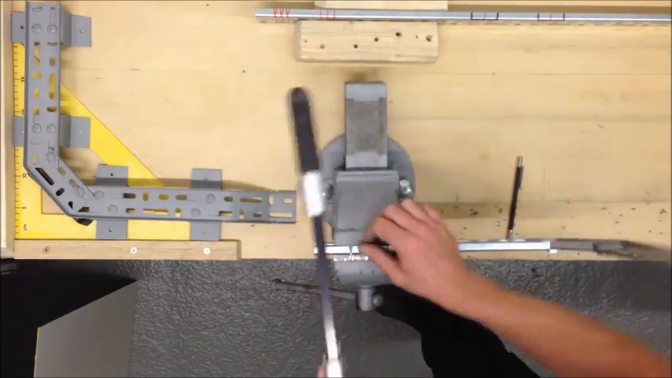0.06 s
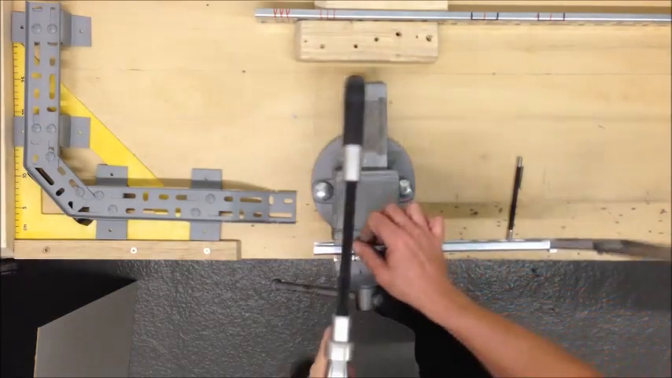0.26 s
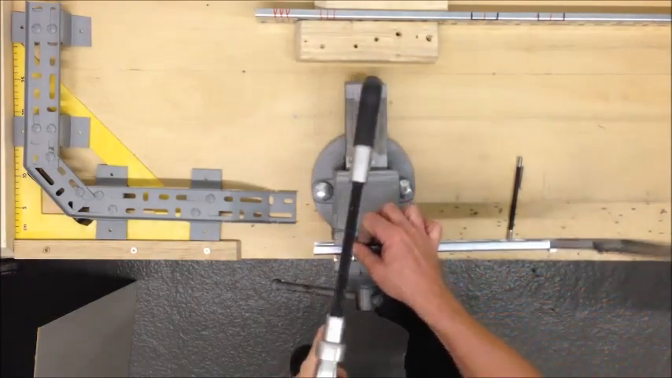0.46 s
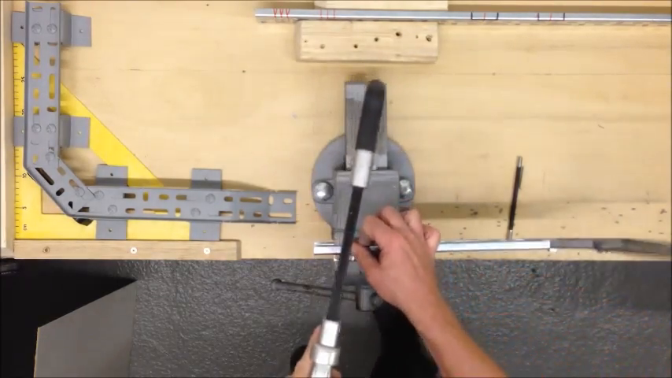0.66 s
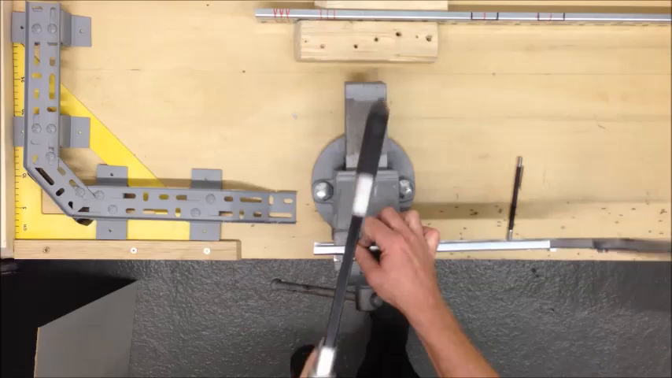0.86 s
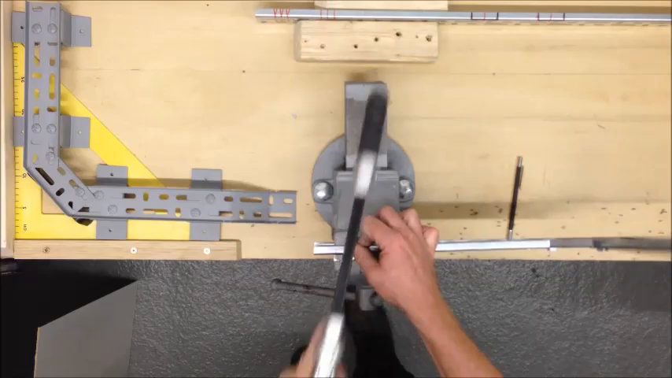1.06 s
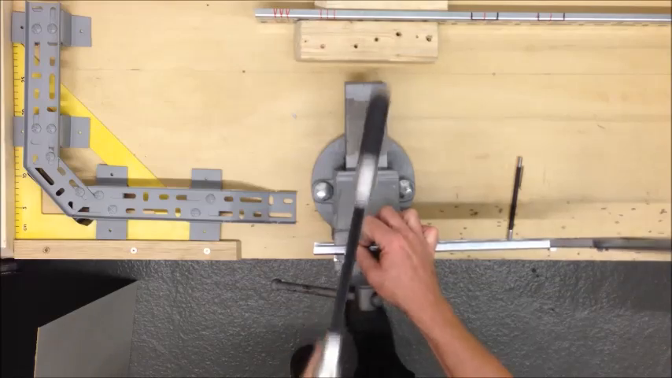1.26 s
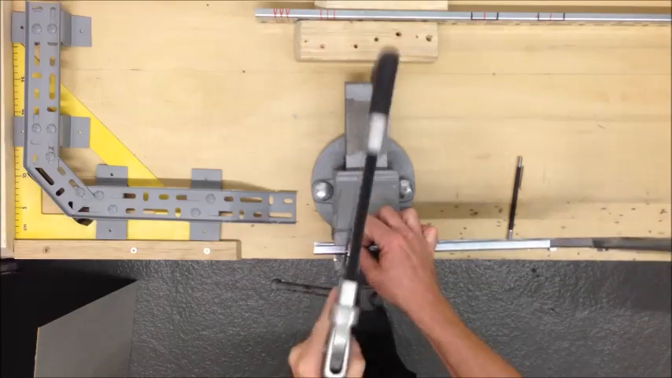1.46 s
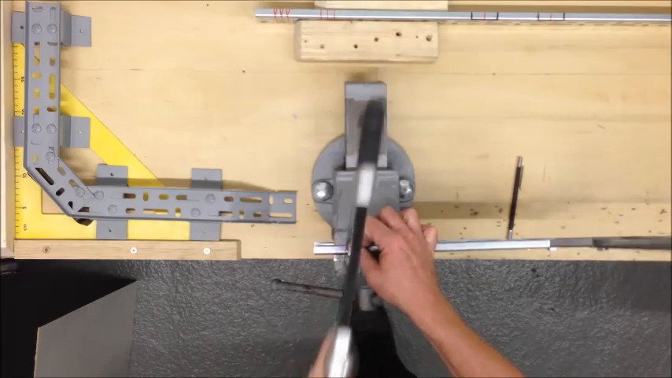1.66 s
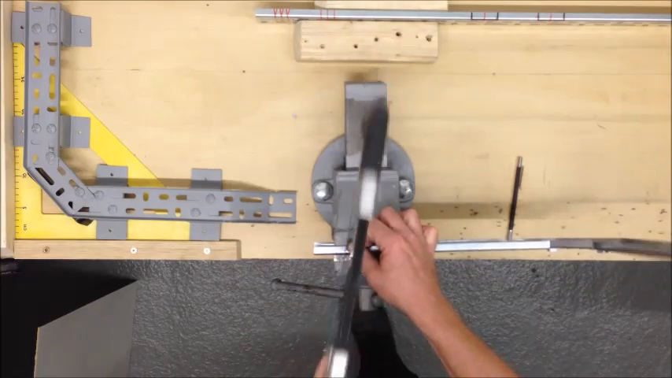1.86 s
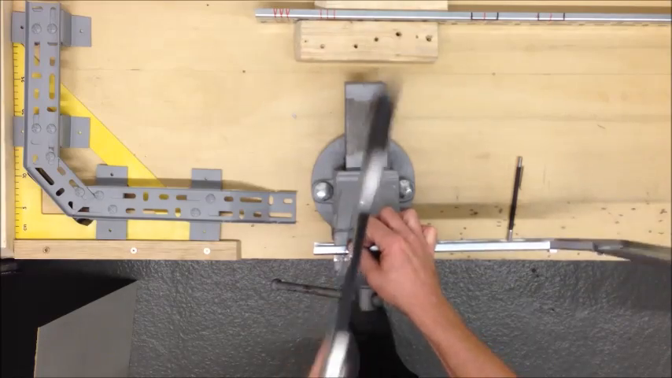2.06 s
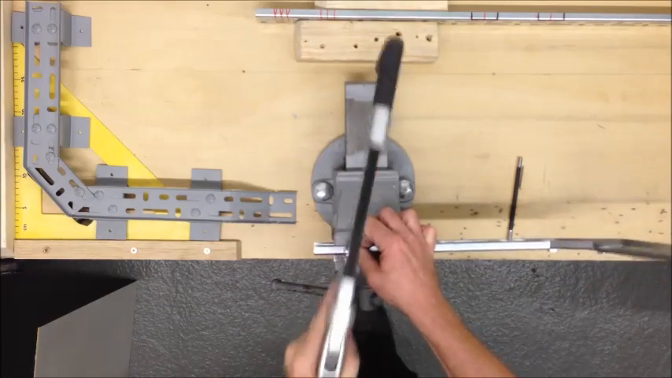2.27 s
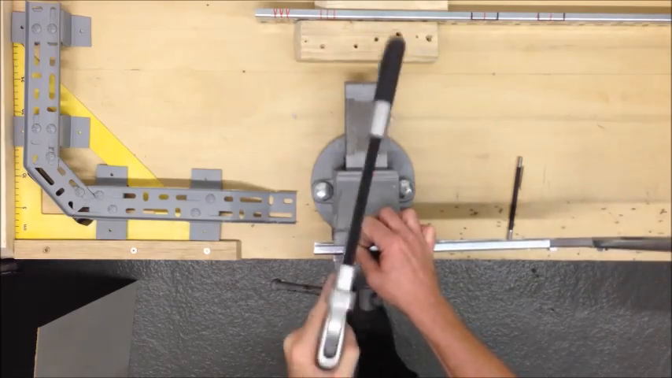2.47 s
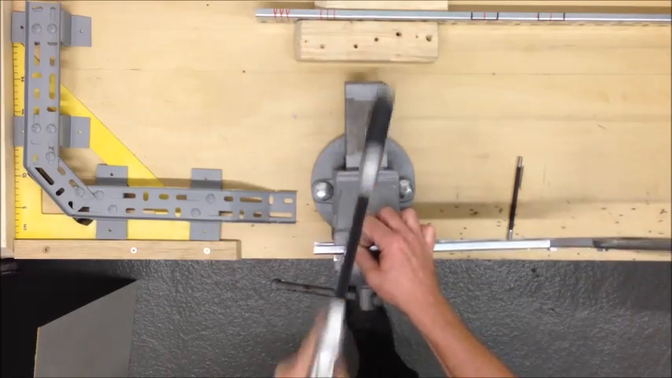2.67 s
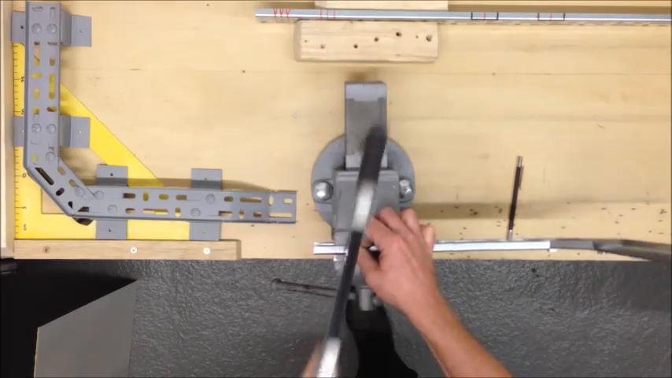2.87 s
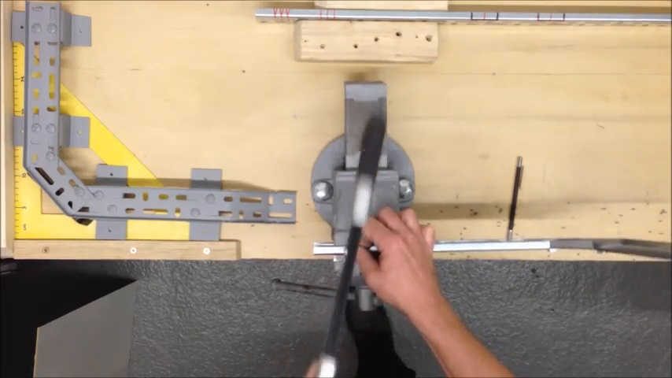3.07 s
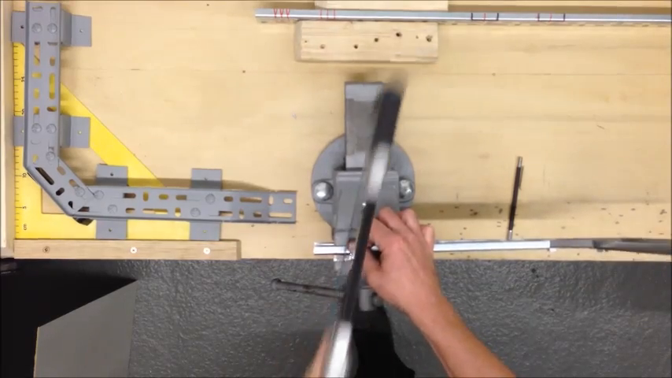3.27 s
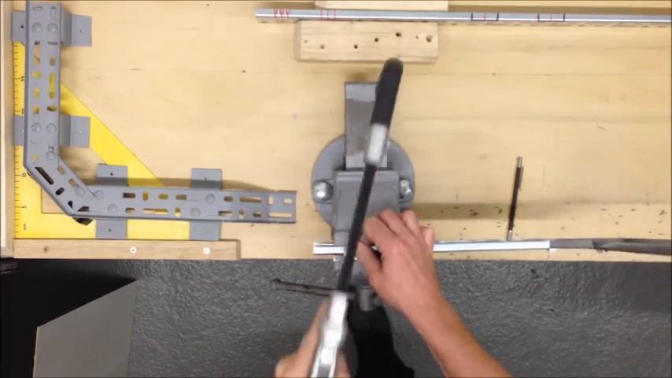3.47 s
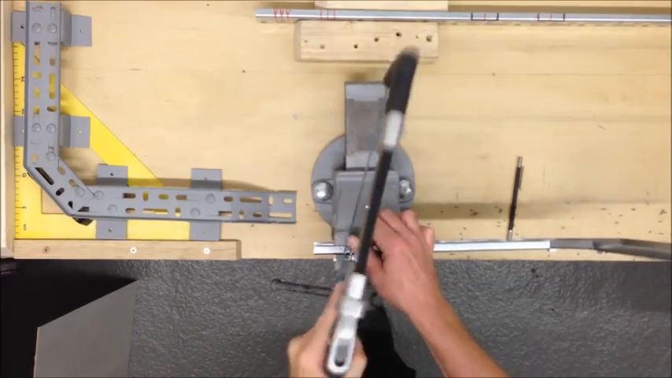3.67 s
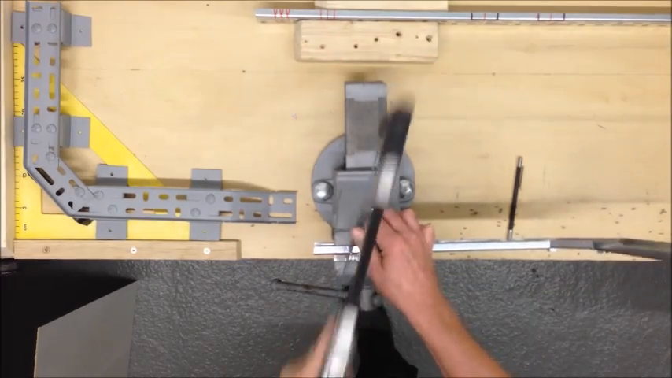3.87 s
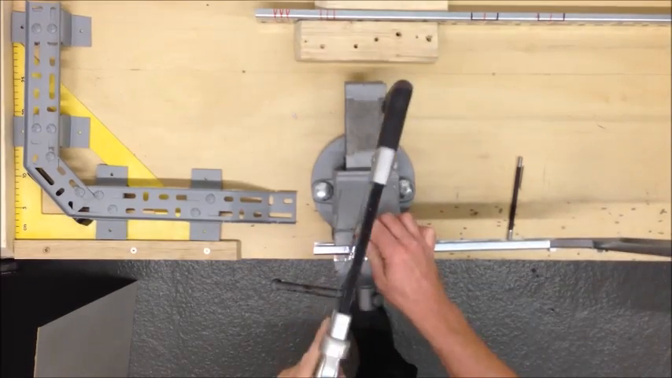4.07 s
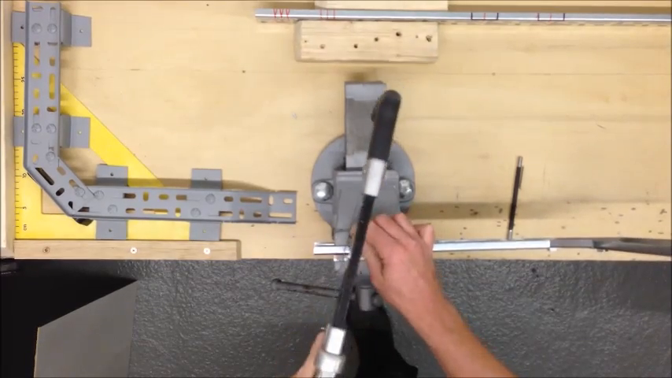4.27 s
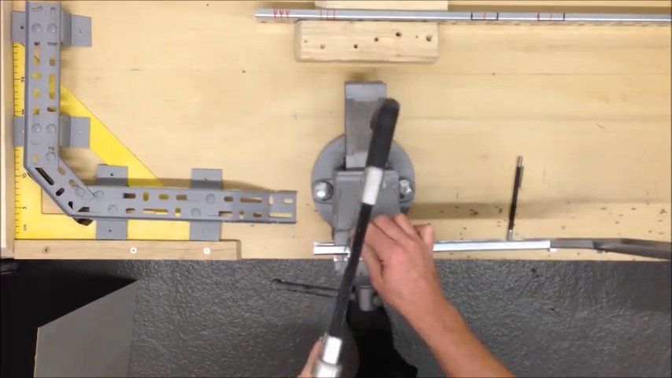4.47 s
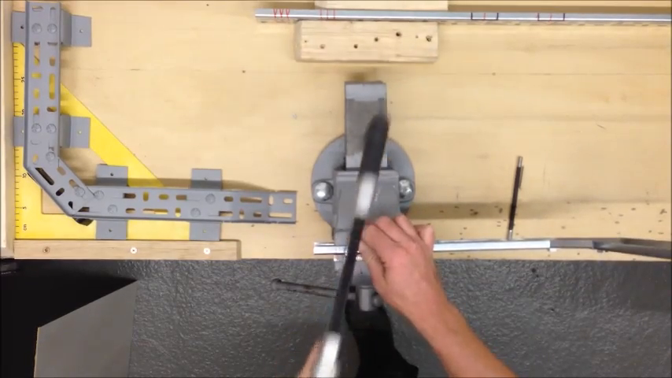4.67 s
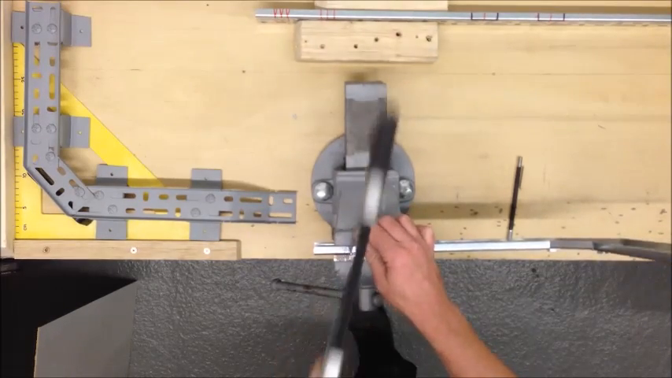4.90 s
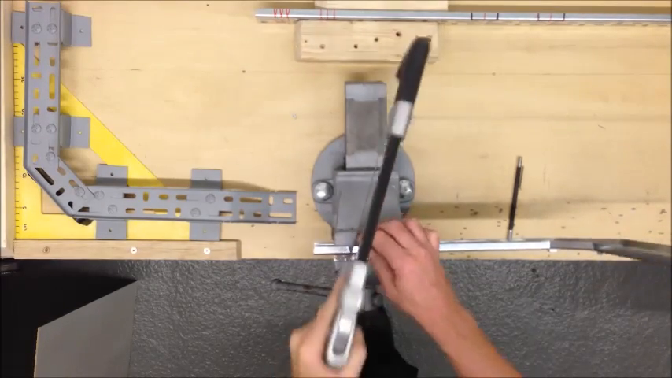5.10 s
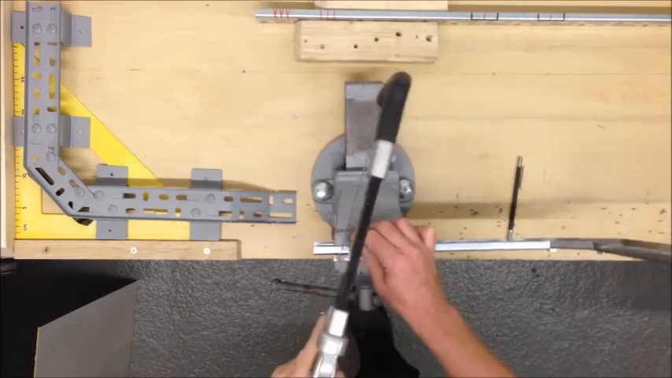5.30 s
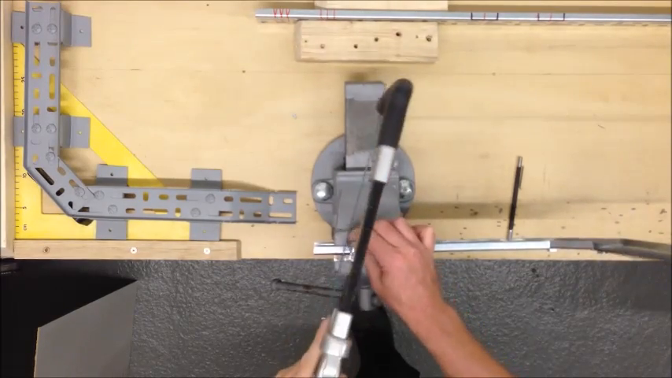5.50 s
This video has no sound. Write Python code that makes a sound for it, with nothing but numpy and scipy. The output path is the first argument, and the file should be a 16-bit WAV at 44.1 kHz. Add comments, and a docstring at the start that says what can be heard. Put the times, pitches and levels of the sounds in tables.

```python
"""A small workshop: a hand hacksaw starts a cut in a metal strip clamped in a bench vise, over quiet room air.
The blade taps the strip and slides lightly in the groove: bursts of tooth snaps and hiss, plus thin decaying rings.
Strokes chatter in two contacts, faint to hard, about four a second in the main run; the blade rubs on the way
back, and squeals on one return. Snaps smear as bending waves and ring the steel through a resonant filter; random
tails add the room's answer. Coloured noises make the bench thud and rumble; the level dips briefly once."""
import sys
import numpy as np
from scipy import signal
from scipy.fft import rfft, irfft, next_fast_len
from scipy.io import wavfile
from scipy.ndimage import uniform_filter1d, map_coordinates

SR = 44100
rng = np.random.default_rng(int(sys.argv[2]) if len(sys.argv) > 2 else 0)


def inscribe(sig):
    """Save sig as 16-bit PCM at rate SR to the path in sys.argv[1].

    A 1-D sig is mono; a 2-D sig holds one channel per row.
    Samples are clipped to [-1, 1] before scaling.
    """
    pcm = np.round(np.clip(np.atleast_2d(sig).T, -1, 1) * 32767)
    wavfile.write(sys.argv[1], SR, pcm.astype(np.int16))


N = 244314

# Colour of the still room air: f/Hz, relative level per Hz/dB
AIR_COLOUR = [(25, -28), (50, -18), (100, 0.5), (135, -2), (220, -1), (400, -4.5), (1000, -3.5), (2500, -7),
              (5000, -14), (10000, -19), (13000, -18.5), (16000, -37)]
# Shaking of the bench before the layer trims: t/s, rumble level/dB, thud level/dB
BENCH_LEVELS = [(0.0, -77, -103), (0.26, -79, -79), (1.74, -65, -72.5), (1.87, -67, -86),
                (3.39, -64.5, -81), (3.5, -69.5, -105), (3.53, -64.5, -74), (3.75, -74.5, -93),
                (3.89, -61, -83), (4.35, -82.5, -87.5), (4.63, -60.5, -76), (5.34, -68.5, -70),
                (5.46, -85, -94), (5.54, -67, -79)]
# Colour of the thudding bench frame: f/Hz, relative level per Hz/dB
THUD_COLOUR = [(20, -22), (40, -18.5), (70, -8), (105, -3.5), (130, -13.5), (200, -55.5)]
# Colour of the rumbling wooden bench top: f/Hz, relative level per Hz/dB
WOOD_COLOUR = [(60, -35.5), (105, -11.5), (130, 4.5), (150, -2.5), (175, 4), (205, -2.5), (230, 3),
               (290, -5.5), (430, -7), (700, -34), (1500, -83.5)]
# Light slides in the groove: start t/s, length/s, relative level/dB, tilt/(dB per octave), free blade note f/Hz
SLIDES = [ (.075, 0.1, -74, -3, 2580), (.301, 0.096, -62.5, -2.5, 2650), (0.615, 0.24, -67, -2, 2520),
          (0.913, .22, -65.5, -3, 2300), (1.126, 0.1, -49, -0.2, 1970), (1.304, .11, -51.5, -3.5, 1300),
          (1.452, .11, -45.5, 0.2, 9550), (1.611, 0.12, -47, -3.5, 1390), (1.753, .112, -41, 1.5, 4340),
          (4.045, .05, -47.5, -1.5, 2080), (4.503, 0.17, -63, -3, 1120), (4.61, 0.081, -47.5, -1.5, 1090),
          (4.745, .11, -39.5, 1.5, 2540), (5.014, 0.096, -37.5, 2, 2540)]
# Broad response of the cut: f/Hz, relative level/dB
RASP = [(100, -41), (350, -11), (500, -11.5), (650, -4.5), (850, -0.5), (1400, -6), (2000, 0.5),
        (3000, -2.5), (4500, 0), (6000, -1), (8000, 0.5), (11000, -4.5), (14000, -4.5), (16000, -7)]
# Narrow resonances of saw and clamped strip: f/Hz, width/Hz, level against the broad response/dB
STEEL_MODES = [(541, 35, 0.5), (741, 100, 1), (953, 57, 3.5), (1247, 49, 6), (1590, 140, 4),
               (1927, 55, 3.5), (2112, 37, 5.5), (2410, 37, 4), (2745, 79, 7), (3201, 40, 9.5),
               (3431, 24, 11.5), (3500, 53, 3.5), (3860, 16, -19.5), (3966, 21, 8.5), (4230, 190, 1.5),
               (5900, 160, -1), (7340, 240, -2.5), (8420, 13, -24), (7850, 32, 2.5), (8500, 72, -8.5),
               (7670, 55, -3.5), (9290, 240, -1)]
# Decay of the room: f/Hz, t60/s
ROOM_DECAY = [(200, 0.65), (1000, 0.31), (3500, 0.39), (8000, 0.32), (15000, 0.23)]
# Blade knocking against the strip: t/s, relative level/dB, extra level of the ring/dB
TAPS = [(.307, -50.5, -28), (.366, -37.5, -28), (.515, -38, -17.5), (0.6, -46, -12.5), (1.126, -58, -20),
        (4.372, -51, -24), (4.748, -36, -24), (5.469, -54, -22), (5.5, -45, -31)]
# Ringing modes of one tap: f/Hz, typical relative level/dB, t60/s
TAP_MODES = [(6400, 5, 0.028), (6660, -6, .06), (7900, 0, 0.076), (10200, -2, .08), (13370, -18, .08)]
# Strokes that chatter at a clear tooth rate, from faint to hard, and one squeal on a return (the last row).
# First contact: full grip t/s, relative level/dB, build-up/s, middle tooth rate f/Hz,
#   free blade note f/Hz, note strength/dB.
# Second contact: delay of its full grip/s, length/s, level against the first/dB, middle tooth rate f/Hz
STROKES = [ (1.126, -42.5, 0.0035, 577, 2300, 11, .036, 0.041, -5.5, 559),
           (1.929, -20.5, 0.0022, 800.2, 3300, -3.5, .017, .014, -7, 938),
           (2.166, -21.5, .0026, 828, 2500, 4.5, 0.042, 0.015, -4.5, 1215),
           (2.402, -20, 0.0028, 714, 2380, 4.5, .019, 0.029, -10, 1104),
           (2.645, -22.5, 0.0027, 720, 2300, 10, 0.0088, 0.03, -4, 656.2),
           (2.884, -21.5, 0.0022, 760, 2360, -14.5, 0.023, 0.022, -5.5, 900.5),
           (3.146, -26.5, 0.0055, 1115, 2070, 15.5, 0.017, 0.028, -7, 1147),
           (3.374, -25, 0.0025, 1210, 2320, 14.5, 0.031, 0.03, 0.5, 852.6),
           (3.627, -21.5, 0.0055, 1205, 2250, 11.5, 0.018, 0.017, -2.5, 1020),
           (3.861, -23.5, 0.0016, 935.6, 4860, 12.5, .017, .03, -4, 911.3),
           (4.099, -33, 0.0046, 845, 2300, 8.5, .022, 0.012, 4.5, 826),
           (4.939, -20, 0.0021, 573.3, 1830, 6.5, .013, .02, -11.5, 532.4),
           (4.978, -20.5, 0.0033, 639.6, 1400, 8, 0.018, 0.019, -5.5, 551.3),
           (5.106, -21, 0.01, 1796, 1965, 7.5, .013, 0.056, -11.5, 2004)]
# Brief dip in level: start t/s, end t/s
DIP = (1.789, 1.820)

SLIDE_TOOTH_HZ, SLIDE_SCATTER, SLIDE_NOTE_DB = 733.4, 0.2506, 7  # top tooth rate, timing scatter in cycles
LEAD_S = .03  # the chatter starts this long before full grip
FIRST_S, FIRST_TILT_DB, SECOND_TILT_DB = 0.013, 0.92, 0.59  # length after full grip; tilts in dB per octave
FIRST_SCATTER, SECOND_SCATTER = 0.0608, .085  # cycles at 1000 teeth a second; faster is rougher, up to a cap
SECOND_BUILD_S, SECOND_NOTE_HZ, SECOND_NOTE_DB = 0.0051, 2680, 0.5
GLIDE_SHARE = .2  # each contact's tooth rate glides by this share of the interval from first to second
SECOND_SLOWING = .97  # further factor on the glide of the second contact, which also brakes the blade
BRIGHTEN_DB, USUAL_TOOTH_HZ = 0.75, 846  # added dB per octave of tilt for each doubling of the tooth rate
RUN_GAP_S = .3  # table rows closer than this have a rubbing return between them
RETURN_START, RETURN_LENGTH, RETURN_DB = .38, .39, -43  # shares of the time between rows; relative level
RETURN_TOOTH_HZ, RETURN_SCATTER, RETURN_TILT_DB = 1102, .17, 1.36  # top rate, cycles, dB per octave
RETURN_NOTE_HZ, RETURN_NOTE_DB = 4270, 7.5
TOP_HZ = 15600  # nothing sounds from here up


def amp(db):
    """Decibels to linear gain."""
    return 10 ** (np.asarray(db) / 20)


def unit(x):
    """Scale to rms 1."""
    return x / np.sqrt(np.mean(x ** 2) + 1e-20)


def along(points, hz):
    """Read (f/Hz, value) points on a log frequency axis."""
    f, values = np.transpose(points)
    return np.interp(np.log(hz + 1), np.log(f + 1), values)


def add(track, s, x):
    """Mix x into the track from time s on."""
    part = track[round(s * SR):][:len(x)]
    part += x[:len(part)]


def wobble(rate, n):
    """A smooth random curve with rate knots a second."""
    return map_coordinates(rng.standard_normal(SR // 8), [np.arange(n) * rate / SR], mode="wrap")


def filtered(x, response):
    """Filter x by a response given as a function of frequency."""
    m = next_fast_len(len(x) + SR // 8)
    return irfft(rfft(x, m) * response(np.fft.rfftfreq(m, 1 / SR)), m)[:len(x)]


def noise(colour):
    """Steady noise of rms 1 with the given colour."""
    return unit(filtered(rng.standard_normal(N), lambda hz: amp(along(colour, hz))))


def still_air(air_db=-72):
    """The air of the still room: a steady bed of coloured noise."""
    return amp(air_db) * noise(AIR_COLOUR)


def bench(thud_db=-3.0, rumble_db=-2, uneven_db=3, jolts_per_s=14):
    """The vise shakes the wooden bench in uneven jolts: its frame thuds and its top rumbles."""
    s, rumble_points, thud_points = np.transpose(BENCH_LEVELS)
    t = np.arange(N) / SR
    jolt_db = uneven_db * wobble(jolts_per_s, N)
    rumble_level = np.interp(t, s, rumble_points) + jolt_db + rumble_db
    thud_level = np.interp(t, s, thud_points) + jolt_db + thud_db
    return amp(thud_level) * noise(THUD_COLOUR) + amp(rumble_level) * noise(WOOD_COLOUR)


def teeth(rate, scatter, size_db):
    """One snap per passing tooth, each a little off time and of its own size; rms 1."""
    n = len(rate)
    turns = np.cumsum(rate) / SR
    late, size = rng.standard_normal((SR // 32, 2))[:int(turns[-1]) + 1].T
    cycle = np.arange(len(late)) + .5 + scatter * late
    at = np.interp(cycle, turns, np.arange(n), right=2 * n)  # snaps past the end are dropped below
    # a windowed sinc places each snap between samples
    samples = np.floor(at)[:, None] + np.arange(-7, 9)
    offset = samples - at[:, None]
    pulse = np.sinc(offset) * np.cos(np.pi * offset / 16) ** 2
    snaps = amp(size_db * size)[:, None] * pulse
    return unit(np.bincount(np.abs(samples).astype(int).ravel(), snaps.ravel(), n)[:n])


def contact(x, tooth_hz, tilt_db, blade_hz, blade_db, width_hz=200, octave_db=-7, edge=0.67):
    """Colour of one contact: little below the tooth rate, tilted, and the free blade sings with its octave."""
    def note(hz, k):
        return 1 / (1 + (2 * (hz / k - blade_hz) / width_hz) ** 2)

    def response(hz):
        octave = amp(octave_db) ** 2 * note(hz, 2.014)  # slightly stretched
        sing = np.sqrt(1 + amp(blade_db) ** 2 * (note(hz, 1) + octave))
        slope = amp(tilt_db * np.log2(np.maximum(hz, 500) / 5000))
        low_cut = 1 / np.sqrt(1 + (edge * tooth_hz / (hz + 1)) ** 8)
        return sing * slope * low_cut

    return unit(filtered(x, response))


def rub(length, tooth_hz, scatter, tilt_db, blade_hz, blade_db,
        size_db=4.0, hiss_db=-2, uneven_db=1.5, swell=0.46):
    """A light stroke speeds up and slows down: the teeth skim the groove, louder with speed."""
    n = int(length * SR)
    speed = np.abs(np.sin(np.pi * np.arange(n) / n))
    snaps = teeth(tooth_hz * (1 + speed) / 2, scatter, size_db)
    hiss = amp(hiss_db) * rng.standard_normal(SR // 2)[:n]
    level = amp(uneven_db * wobble(104, n)) * speed ** swell
    return level * contact(snaps + hiss, tooth_hz, tilt_db, blade_hz, blade_db)


def slides(soft_hz=12500):
    """The blade slides lightly in the groove without biting, so the teeth only skim."""
    force = np.zeros(N)
    for s, length, db, tilt_db, blade_hz in SLIDES:
        skim = rub(length, SLIDE_TOOTH_HZ, SLIDE_SCATTER, tilt_db, blade_hz, SLIDE_NOTE_DB)
        add(force, s, amp(db) * skim)
    return filtered(force, lambda hz: 1 / np.sqrt(1 + (hz / soft_hz) ** 10))  # a low-pass on the slides


def restless(force, patchy_db=3):
    """No two chips tear alike: the colour of the contact shifts every few milliseconds."""
    z = signal.stft(force, nperseg=256)[2]
    field = uniform_filter1d(rng.standard_normal(z.shape), size=3, axis=0)  # blur over frequency
    field = uniform_filter1d(field, size=4, axis=1)  # blur over time
    gain = unit(amp(patchy_db * unit(field)))
    return signal.istft(z * gain, nperseg=256)[1][:N]


def bending(force, lag=.003):
    """Bending waves in thin steel: low notes travel slower, smearing each snap into a tiny chirp."""
    # lag is the delay in seconds at 1 kHz; it falls with the root of frequency
    return filtered(force, lambda hz: np.exp(-4j * np.pi * lag * np.sqrt(1000 * hz)))


def steel(force):
    """Saw and strip ring after each snap: a broad response with narrow resonances on it."""
    hz = np.fft.rfftfreq(SR // 2, 1 / SR)
    peaks = sum(amp(db) ** 2 / (1 + (2 * (hz - centre) / width) ** 2) for centre, width, db in STEEL_MODES)
    response = amp(along(RASP, hz)) * np.sqrt(1 + peaks)
    # minimum phase by way of the cepstrum: nothing rings before its cause
    cepstrum = irfft(np.log(response))
    ring = irfft(np.exp(rfft(2 * cepstrum[:SR // 4], SR // 2)))
    return signal.fftconvolve(force, ring / np.linalg.norm(ring))[:N]


def workshop(x, direct_db=-3, wet_db=-1, count=16):
    """Direct sound plus decaying noise tails of the room; as the saw moves, the echoes keep changing."""
    hz, t, z = signal.stft(rng.standard_normal((count, SR // 2)), SR, nperseg=256)
    decay = amp(-60 * t / along(ROOM_DECAY, hz)[:, None])
    tails = signal.istft(z * decay, SR, nperseg=256)[1]
    # crossfade from tail to tail over the whole scene
    place = np.linspace(0, count - 1, N)
    wet = np.zeros(N)
    for k, tail in enumerate(tails):
        near = np.flatnonzero(np.abs(place - k) < 1)
        share = np.cos(np.pi / 2 * (place[near] - k))
        echo = signal.fftconvolve(x[near] * share, tail / np.linalg.norm(tail))
        add(wet, near[0] / SR, echo)
    return amp(direct_db) * x + amp(wet_db) * wet


def taps(crack_db=-6, crack_t60=0.022, low_hz=1500):
    """The blade touches the strip: a short noisy scratch and a thin ring of decaying sines."""
    out = np.zeros(N)
    t = np.arange(SR // 3) / SR
    for s, db, ring_db in TAPS:
        ring = np.zeros(len(t))
        for hz, level, t60 in TAP_MODES:
            mode_db = level + rng.normal(0, 4.0)  # every touch excites the modes differently
            ring += amp(mode_db - 60 * t / t60) * np.sin(2 * np.pi * hz * t)
        crack = amp(-60 * t / crack_t60) * rng.standard_normal(len(t))
        add(out, s, amp(db + ring_db) * ring + amp(db + crack_db) * crack)
    return filtered(out, lambda hz: 1j * hz / (low_hz + 1j * hz))  # gentle low cut


def chatter(length, build, tooth_hz, glide, scatter, tilt_db, blade_hz, blade_db,
            fall=0.0092, chip_db=-8, size_db=3.0, roughest=0.089):
    """The chatter builds up and falls off: a train of tooth snaps with chip hiss that follows them."""
    t = np.arange(int((LEAD_S + length) * SR)) / SR - LEAD_S  # zero at full grip
    rate = tooth_hz * glide ** (np.clip(t / length, 0, 1) - .5)
    snaps = teeth(rate, min(abs(scatter) * tooth_hz / 1000, roughest), size_db)
    chips = unit(uniform_filter1d(np.abs(snaps), size=24) * rng.standard_normal(SR // 4)[:len(t)])
    rise = 1 / (1 + (np.minimum(t, 0) / build) ** 2)
    grip = rise * np.clip((length - t) / fall, 0, 1)
    # a faster blade sounds brighter, up to half a doubling
    bright_db = tilt_db + BRIGHTEN_DB * min(np.log2(tooth_hz / USUAL_TOOTH_HZ), .5)
    return grip * contact(snaps + amp(chip_db) * chips, tooth_hz, bright_db, blade_hz, blade_db)


def strokes():
    """Faint to hard strokes and one squeal on a return: the teeth chatter in two contacts, gliding in rate."""
    force = np.zeros(N)
    for s, db, build, tooth_hz, blade_hz, blade_db, after, second_s, second_db, second_hz in STROKES:
        glide = (second_hz / tooth_hz) ** GLIDE_SHARE
        first = chatter(FIRST_S, build, tooth_hz, glide, FIRST_SCATTER, FIRST_TILT_DB, blade_hz, blade_db)
        second = chatter(second_s, SECOND_BUILD_S, second_hz, glide * SECOND_SLOWING,
                         SECOND_SCATTER, SECOND_TILT_DB, SECOND_NOTE_HZ, SECOND_NOTE_DB)
        add(force, s - LEAD_S, amp(db) * first)
        add(force, s + after - LEAD_S, amp(db + second_db) * second)
    return force


def returns():
    """Between two close rows of the stroke table the blade rubs lightly on its way back."""
    force = np.zeros(N)
    starts = np.array(STROKES)[:, 0]
    for s, period in zip(starts, np.diff(starts)):
        if period < RUN_GAP_S:
            back = rub(RETURN_LENGTH * period, RETURN_TOOTH_HZ, RETURN_SCATTER,
                       RETURN_TILT_DB, RETURN_NOTE_HZ, RETURN_NOTE_DB)
            add(force, s + RETURN_START * period, amp(RETURN_DB) * back)
    return force


def scene():
    """Saw in its room, bench and still air, alike in both channels."""
    force = slides() + strokes() + returns()
    saw = steel(bending(restless(force))) + taps()
    mono = workshop(saw) + bench() + still_air()
    return np.array([mono, mono])


def record(dry):
    """The level dips briefly with softened edges, and a steep cut removes the very top."""
    t = np.arange(N) / SR
    inside = (t > DIP[0]) & (t < DIP[1])
    gate = uniform_filter1d(np.where(inside, amp(-39.5), 1.), size=64)
    return np.array([filtered(x * gate, lambda hz: hz < TOP_HZ) for x in dry])


dry = scene()
out = record(dry)
inscribe(out)
```